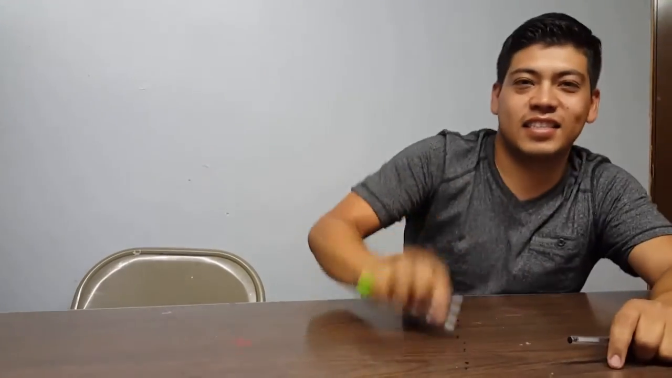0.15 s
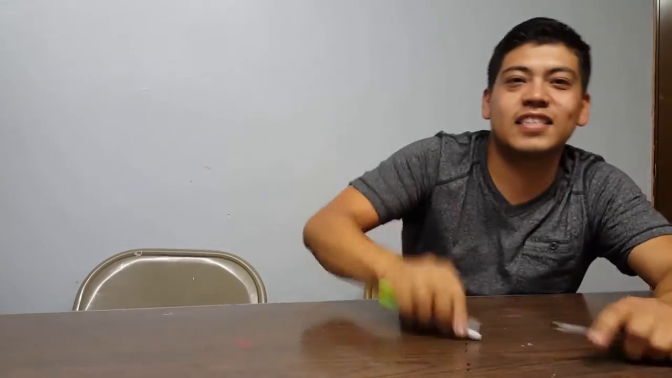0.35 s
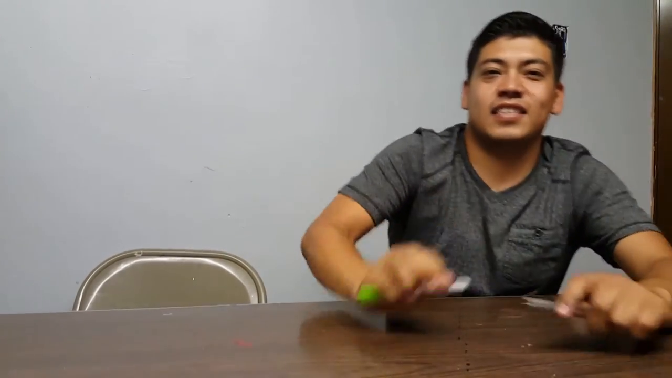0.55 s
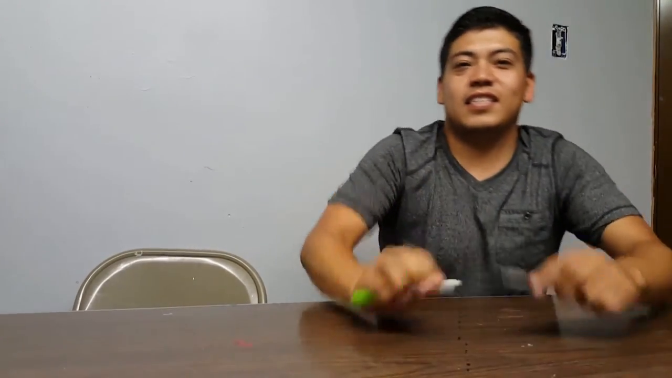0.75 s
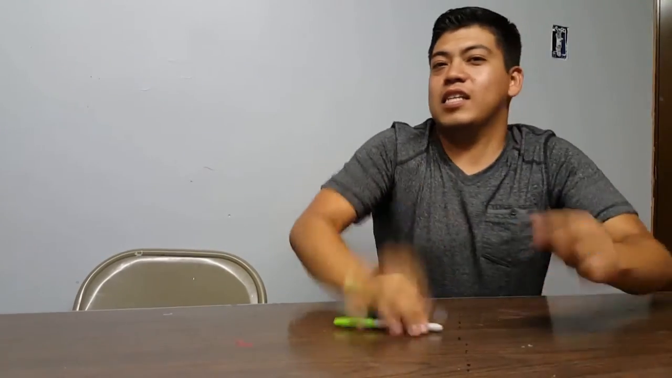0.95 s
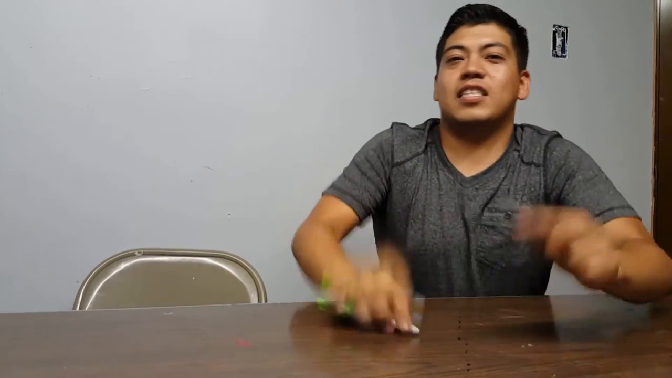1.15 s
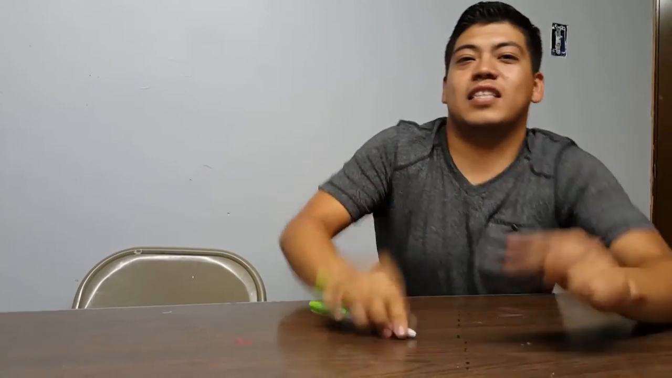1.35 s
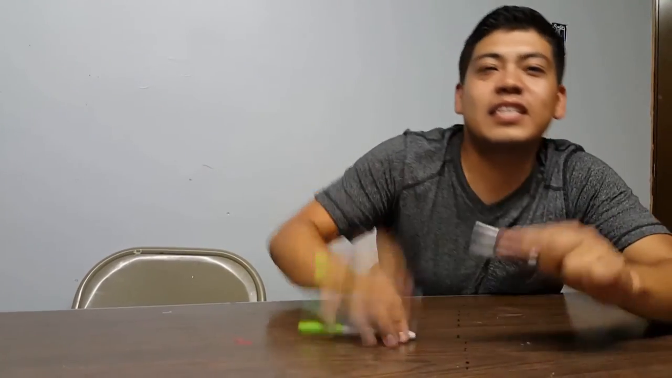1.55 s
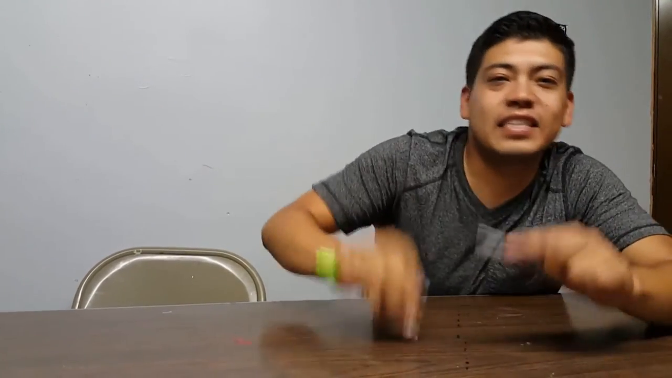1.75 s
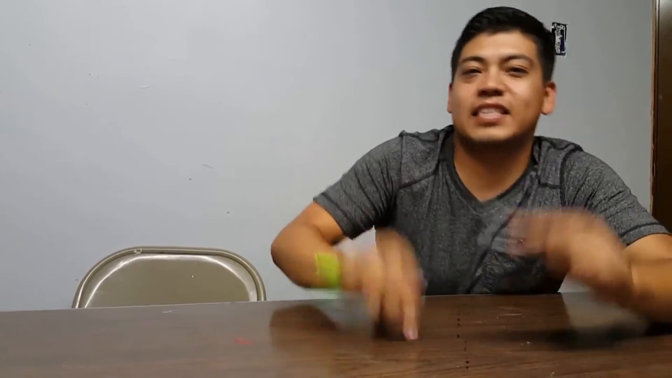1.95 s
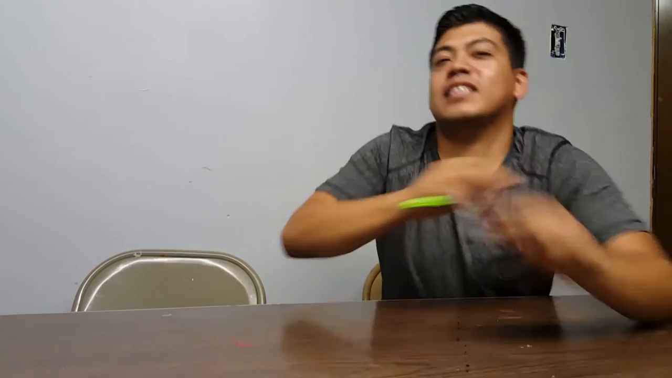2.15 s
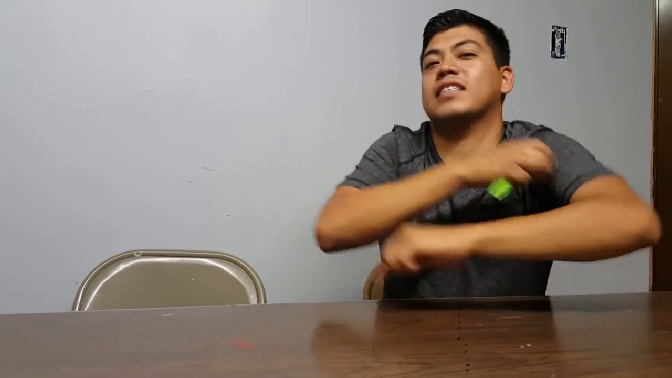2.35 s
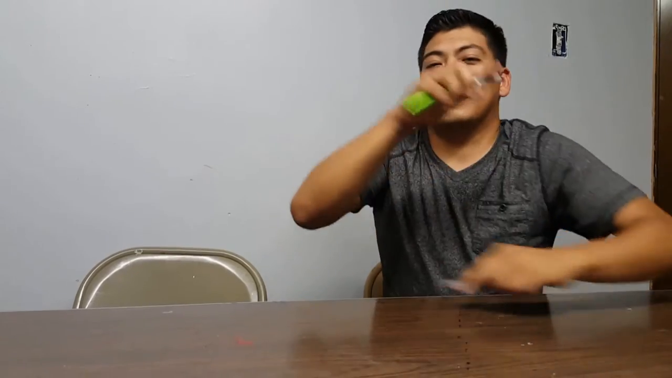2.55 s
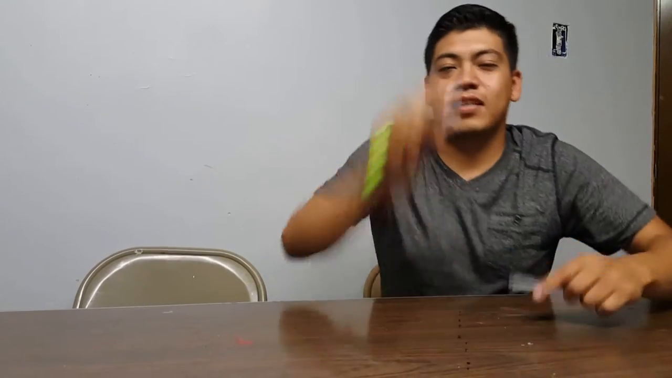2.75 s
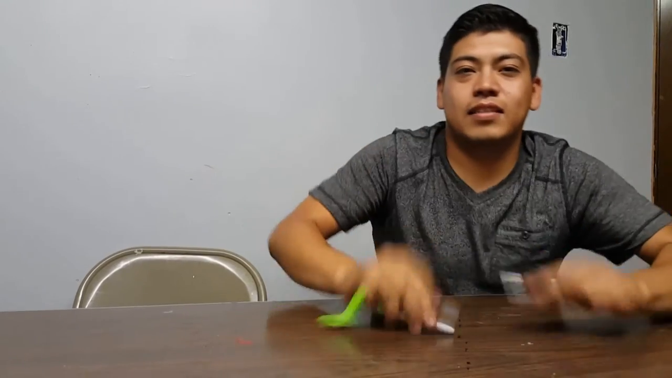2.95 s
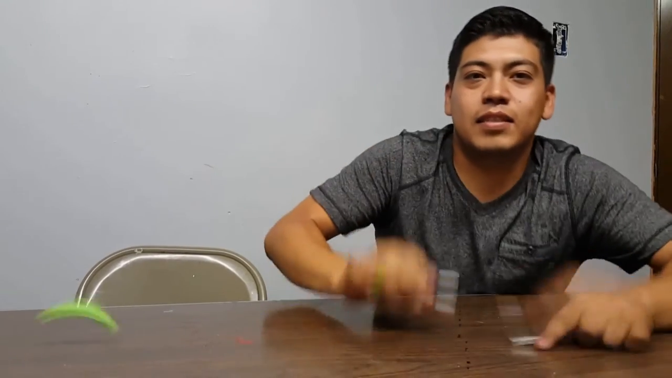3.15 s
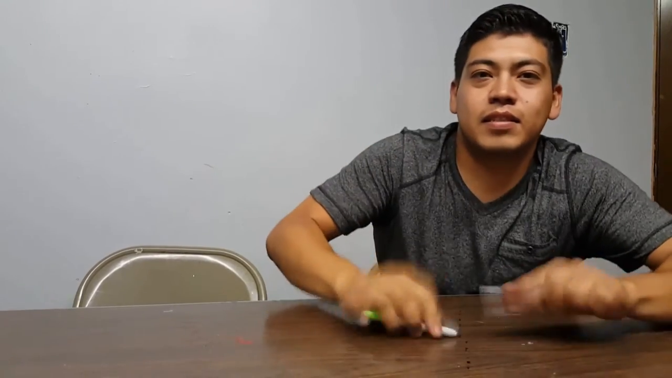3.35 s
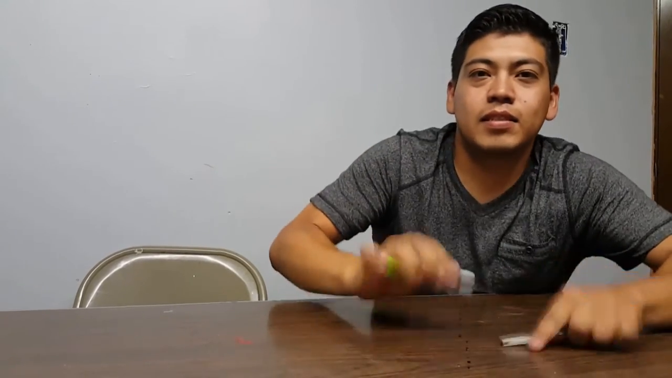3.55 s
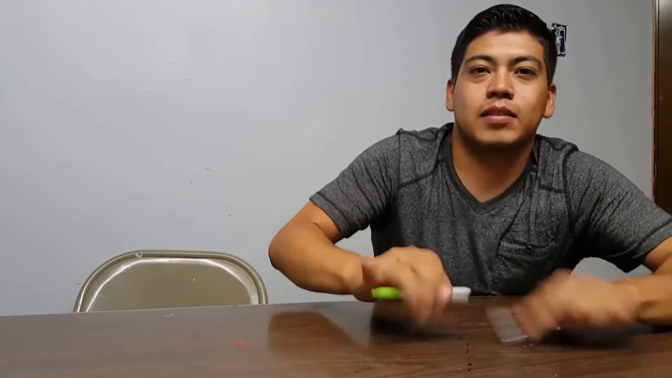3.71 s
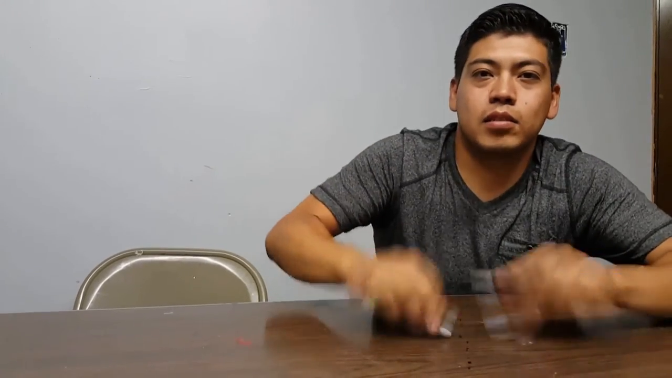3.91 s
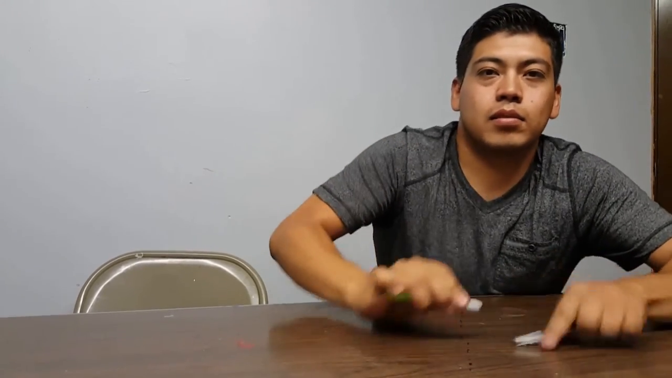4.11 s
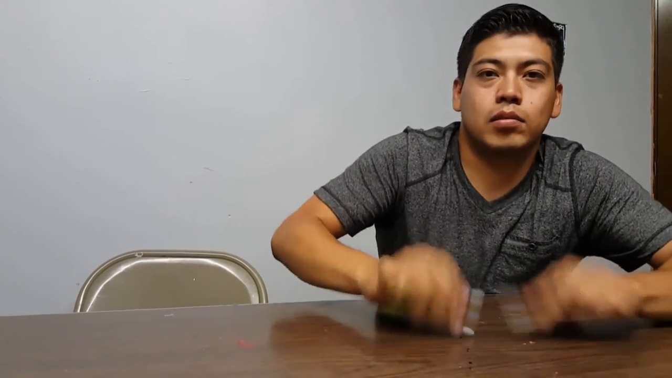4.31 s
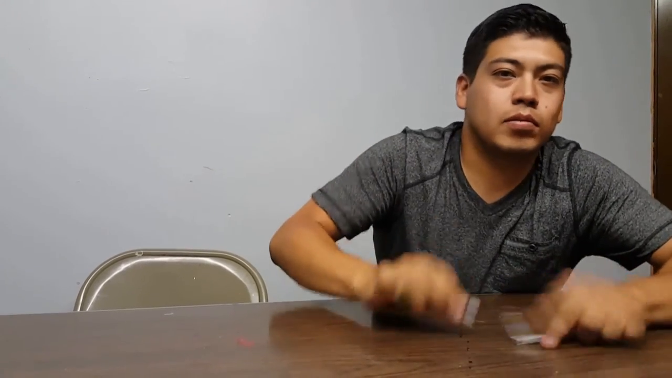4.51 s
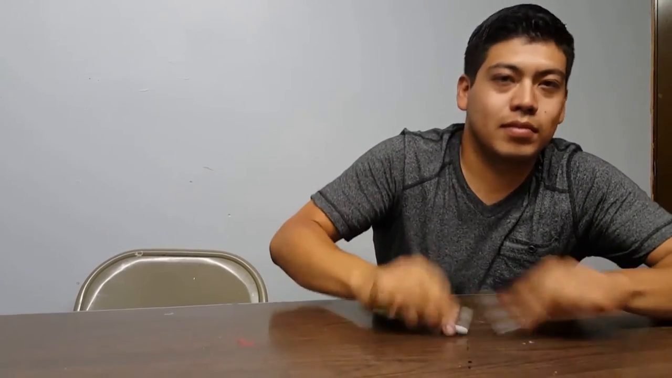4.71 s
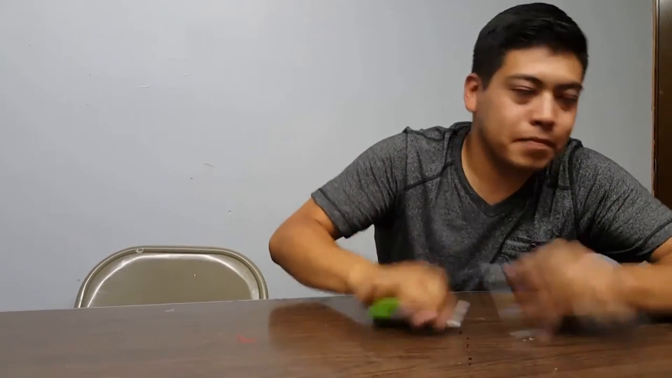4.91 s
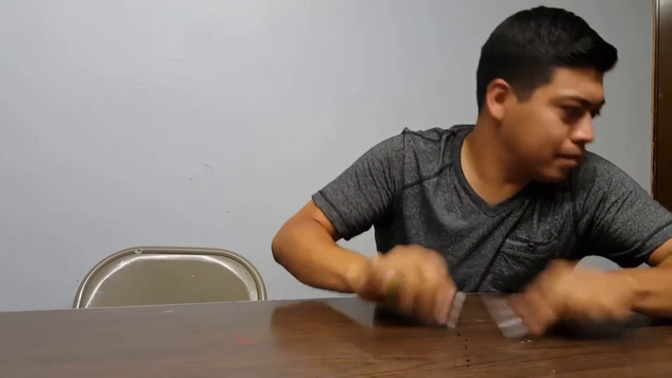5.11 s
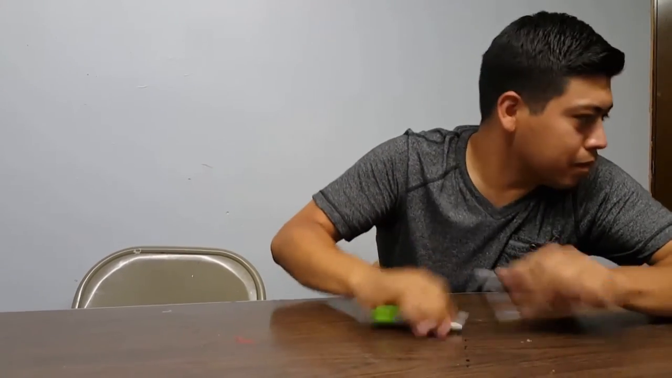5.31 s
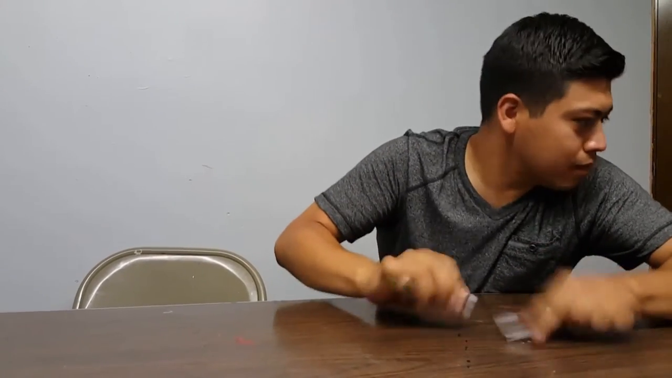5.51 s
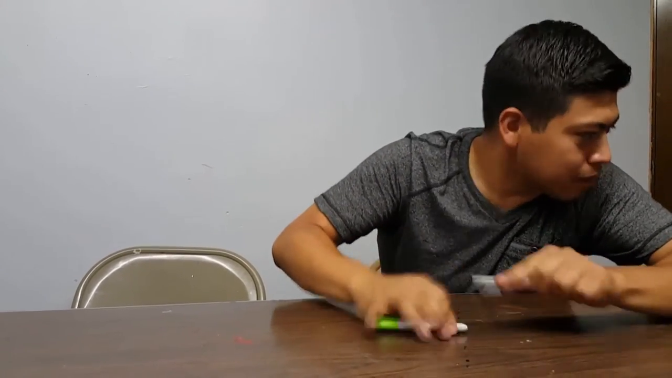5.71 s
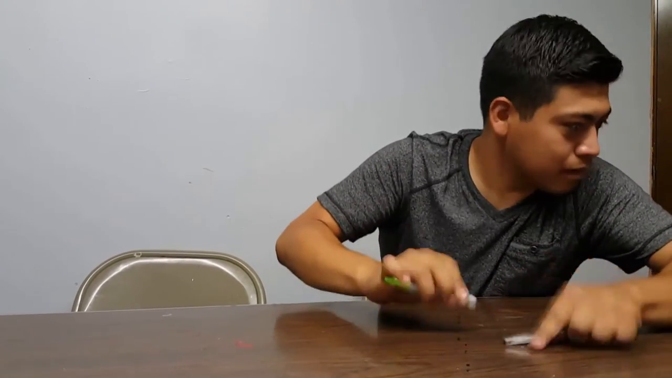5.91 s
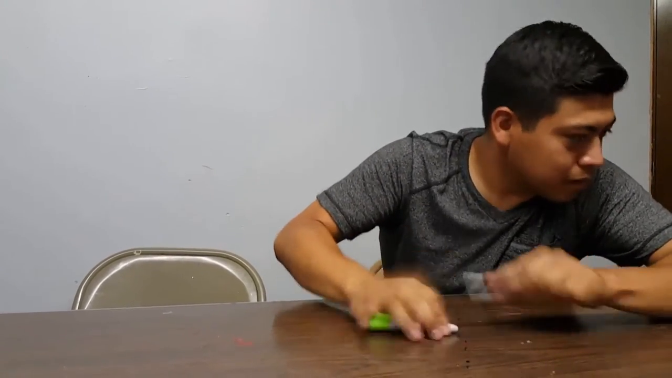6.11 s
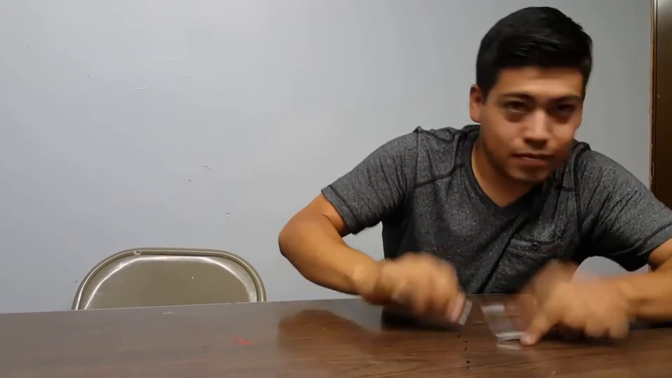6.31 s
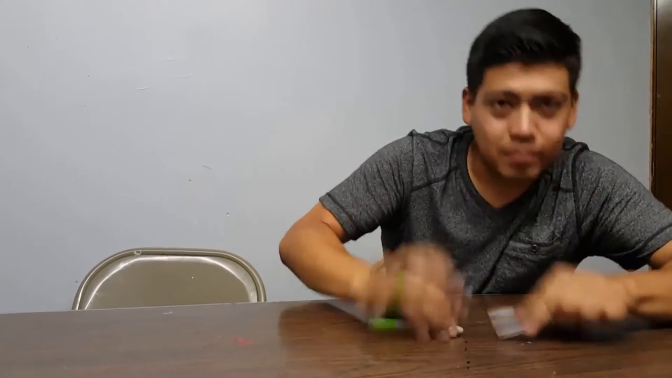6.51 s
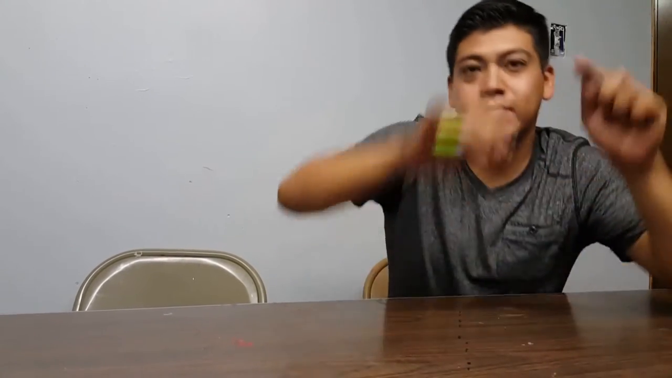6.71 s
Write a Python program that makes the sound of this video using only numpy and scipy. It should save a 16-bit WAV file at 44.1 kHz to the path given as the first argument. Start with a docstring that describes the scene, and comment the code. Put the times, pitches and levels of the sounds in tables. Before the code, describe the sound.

In a small, hard-walled room, pens and hands drum on a wooden table close to a small recorder. A tip and flat slap land at 0.1 s, soft wrist touches at 0.3, a tap at 0.5, then deep thumps at 0.7 and 0.9. A bright slap cracks at 1.15, followed by lighter quick taps, a slap at 1.75 and firmer taps until 2.25. A break leaves only room tail and faint hiss with hum. At 3.0 a heavy thump starts a dense, loud run of ticks and woody knocks, with slaps at 3.15, 3.4 and 3.8. It softens around 4.0, a dull wrist thump falls at 4.2, and strong taps return from 4.5. The sharpest slap hits at 5.07. Lighter rapid taps continue, punctuated by rattling slaps at 5.5, 5.9, 6.3 and 6.74, where it ends.

```python
"""A small bare room with a wooden table: two pens and the hands that hold them drum on it fast, close by.
Each blow rings banks of decaying modes: a plastic tick, a knock of pen on board, a thump of the table top.
Flat slaps add a crack, a push of air and a rattling refill; a few light taps ring briefly near 2 kHz.
Echoes and shaped noise are the room. Faint hum and hiss swell and dip behind; the gain control of the small
recorder sinks after sharp blows."""
import sys
import numpy as np
from scipy import signal
from scipy.fft import rfft, irfft, next_fast_len
from scipy.io import wavfile
from scipy.ndimage import uniform_filter1d

SR = 44100
rng = np.random.default_rng(int(sys.argv[2]) if len(sys.argv) > 2 else 0)


def level_to_linear(level):
    """Convert decibel levels to linear amplitude factors, elementwise."""
    exponent = np.asarray(level, float) / 20
    return 10 ** exponent


def generate_wav(sig):
    """Save sig (samples, or channels by samples) to the path in sys.argv[1] as 16-bit PCM at SR."""
    pcm = np.round(np.clip(np.atleast_2d(sig).T, -1, 1) * 32767).astype(np.int16)
    wavfile.write(sys.argv[1], SR, pcm)


N = 298116
TOP_HZ = 16500  # upper edge of all noise and of the microphone signal

# Blow levels are relative: each source trims them.
# taps of a pen tip or knuckle: t/s, tick level/dB, thump level/dB, knock level/dB, f/Hz the knock leans to
TAPS = [(0.4964, -26.5, -27.5, -47.5, 1440), (0.9519, -27.5, -27, -42.5, 720),
        (1.0505, -31, -45, -43.5, 750), (1.2161, -33.5, -31.5, -46, 1080), (1.3448, -39.5, -38, -57, 610),
        (1.4376, -38, -45.5, -50.5, 1120), (1.5381, -42.5, -40, -57.5, 524),
        (1.6214, -38.5, -39.5, -50, 1220), (1.8253, -33, -33.5, -49.5, 1330), (1.9625, -40, -39, -53, 1280),
        (2.0383, -27.5, -27.5, -38, 910), (2.1554, -29.5, -30.5, -51, 805),
        (2.2518, -26, -22.5, -33.5, 1290), (3.083, -25, -23, -34, 850), (3.215, -25, -29, -36.5, 1093),
        (3.2869, -29.5, -25, -39, 537), (3.3486, -25, -23, -32.5, 1160), (3.4733, -24.5, -26, -38, 1200),
        (3.5414, -29, -31.5, -52, 600), (3.601, -28.5, -33, -40, 1300), (3.6658, -30.5, -30.5, -45, 527),
        (3.7264, -25.5, -28, -34.5, 1080), (3.8613, -31.5, -31.5, -44, 1190), (3.9601, -39, -46, -63, 1020),
        (4.0153, -41, -64, -60.5, 2630), (4.0772, -40.5, -44, -63, 640), (4.1353, -34, -35.5, -43, 1080),
        (4.4576, -33.5, -43, -46, 800), (4.5317, -33, -33, -57, 680), (4.5915, -25.5, -32, -34, 843),
        (4.6658, -27.5, -20.5, -36, 550), (4.7199, -31.5, -52, -40.5, 720),
        (4.8006, -37.5, -34, -50.5, 617), (4.86, -32.5, -36, -44.5, 716), (4.9268, -30.5, -28, -52, 610),
        (4.9941, -23, -27, -33.5, 830), (5.1388, -27.5, -36, -38, 1150), (5.2186, -37.5, -74, -62, 760),
        (5.2698, -36.5, -66, -52, 616), (5.3403, -42, -36.5, -54.5, 565), (5.3976, -33, -35, -43.5, 977),
        (5.5477, -31.5, -36, -43.5, 1040), (5.6232, -37.5, -39, -58, 1000), (5.6843, -34.5, -41, -45, 740),
        (5.7509, -38, -34, -54, 557), (5.8212, -32.5, -38, -42.5, 1330), (5.9629, -34, -41, -51, 880),
        (6.0433, -42.5, -63, -60.5, 674), (6.1018, -35.5, -46.5, -54, 705), (6.1707, -42, -38, -56.5, 684),
        (6.235, -32.5, -37, -42.5, 880), (6.3846, -32, -35.5, -47, 970), (6.4664, -37, -44.5, -65, 960),
        (6.5271, -33.5, -46, -47.5, 720), (6.5964, -37, -35.5, -54, 820), (6.661, -30.5, -35.5, -41, 1050)]
# a tip touching down just ahead of a slap, or skipping after a thump: t/s, tick level/dB
TIPS = [(0.0751, -22), (1.135, -22.5), (1.742, -33), (3.004, -29.5), (3.1488, -34), (3.165, -53),
        (3.411, -25), (3.8019, -28.5), (4.2154, -46), (5.0647, -28.5), (5.4764, -32.5), (5.8894, -36.5),
        (6.3097, -31), (6.7292, -39)]
# heel of the hand or wrist, deep and dull: t/s, tick level/dB, thump level/dB, knock level/dB
WRISTS = [(0.2886, -39.5, -43, -65), (0.3054, -41.5, -38, -56.5), (0.6944, -29.5, -14.5, -41.5),
          (0.7597, -48, -27.5, -44), (0.8423, -44, -56, -59), (0.897, -33, -14.5, -40),
          (2.9982, -30.5, -14.5, -34), (4.2068, -30, -23.5, -44.5), (4.285, -40, -65, -52),
          (4.3776, -44.5, -71, -63)]
# pen and hand laid flat: t/s, tick level/dB, thump level/dB, knock level/dB, level/dB of squeezed-out air
SLAPS = [(0.0824, -32.5, -26.5, -25.5, -43), (1.1419, -23.5, -45, -28.5, -31.5),
         (1.7507, -31, -35, -56, -69), (3.1548, -28, -33, -49, -62), (3.416, -25, -22, -46, -69),
         (3.8059, -29, -27.5, -29.5, -33.5), (5.0716, -17.5, -18.5, -30.5, -51),
         (5.4826, -24, -31.5, -35, -67), (5.8959, -25.5, -28, -33, -69), (6.3164, -24.5, -30, -40, -78),
         (6.736, -25.5, -24, -49, -54)]
# pen barrel against the board: f/Hz, level/dB, t60/s of one pole before extra damping
KNOCK = [(572, 10.5, 0.046), (720, -5, 0.069), (1023, -10, 0.042), (1080, 4, 0.012), (1330, 13.5, 0.0039),
         (1600, 4.5, 0.017), (1650, 14, 0.0016), (2640, 10, 0.013), (2960, 8.5, 0.014)]
# loose refill in the barrel: f/Hz, level/dB, t60/s before extra damping
RATTLE = [(1000, -17, .04), (1544, 10.5, .03), (2350, 4, .02), (2820, -0.5, 0.045), (4620, -6, 0.064),
          (5400, -6, 0.027)]


def palm_hz(push_db):
    """The more palm (push of air) in a slap, the lower its knock: an octave for 48 dB."""
    return 1150 * 2 ** ((-27 - push_db) / 48)


# all blows, with the columns of the taps
BLOWS = (TAPS
         + [(s, db, db - 4.5, db - 12.5, 1514) for s, db in TIPS]
         + [row + (720,) for row in WRISTS]
         + [row[:-1] + (palm_hz(row[-1]),) for row in SLAPS])
BLOW_S, TICK_DB, THUMP_DB, KNOCK_DB, KNOCK_HZ = np.transpose(BLOWS)
INDEX = np.arange(len(BLOWS))
FLAT = INDEX >= len(BLOWS) - len(SLAPS)
WRIST = ~FLAT & (INDEX >= len(TAPS) + len(TIPS))
TIP = ~FLAT & ~WRIST & (INDEX >= len(TAPS))
EDGE_THUMP_HZ = 231 * (KNOCK_HZ / 814) ** -0.23  # duller knocks go with higher thumps
THUMP_HZ = np.where(FLAT, 235, np.where(WRIST, 135.5, EDGE_THUMP_HZ))


def evened(x):
    """Scales to unit rms."""
    return x / np.sqrt(np.mean(x ** 2) + 1e-20)


def strikes(size, lag_s=0):
    """One impulse of the given size at each blow, in each channel."""
    at = np.minimum(np.round((BLOW_S + lag_s) * SR).astype(int), N - 1)
    train = np.zeros((N,) + size.shape[1:], size.dtype)
    np.add.at(train, at, size)
    return train.T


def lean(modes, hz, db_per_octave):
    """Modes far from the pitch that a blow favours speak less."""
    octaves = np.log2(np.outer(1 / hz, np.transpose(modes)[0]))
    return -db_per_octave * abs(octaves)


def ring(modes, level_db, spread_db, turn, apart, lean_db=0, lag_s=0, damp=1, order=1, sweep=0):
    """Each blow shares its force among the modes anew; a mode driven twice over swells before it dies."""
    hz, db, t60 = np.transpose(modes)
    place = rng.standard_normal((len(BLOWS), len(modes), 3))
    share = level_to_linear(db + lean_db + spread_db * place[..., 0])
    share = share / np.linalg.norm(share, axis=1, keepdims=True) * level_to_linear(level_db)[:, None]
    # the two microphone ports hear each mode a little apart (radians)
    phase = turn * place[..., 1:2] + apart * place[..., 2:] * [1, -1]
    # upper modes come into step later: the pitch seems to rise
    phase -= sweep * np.arange(len(modes))[:, None] ** 2
    poles = np.exp((2j * np.pi * hz - damp * np.log(1000) / t60) / SR)
    out = np.zeros((2, N))
    for k, pole in enumerate(poles):
        peak = (np.e * (1 - abs(pole))) ** (order - 1)
        force = strikes(share[:, [k]] * np.exp(1j * phase[:, k]), lag_s)
        out += signal.lfilter([peak], np.poly([pole] * order), force).imag
    return out


def tick():
    """The plastic tip rings for an instant; the more knock under a tick, the higher the tick."""
    # tip of the pen: f/Hz, level/dB, t60/s of one pole
    tip_modes = [(3000, 3.5, 0.0026), (3600, 1.5, 0.0046), (4500, 1, 0.0024), (6670, 4.5, 0.002),
                 (8240, 13, 0.00072), (10700, 11.5, 0.00049), (14050, 8, 0.001), (14900, 4, 0.00093)]
    hz = np.clip(5560 * 2 ** ((KNOCK_DB - TICK_DB + 13.5) / 4), 3300, 9000)
    slope = np.where(FLAT | TIP, 0, 3.5)[:, None]
    return ring(tip_modes, TICK_DB + 0.5, 3, 2.41, 1.0, lean(tip_modes, hz, slope), order=2)


def tok(level_db, hz, lag_s):
    """The length of barrel that strikes rings briefly on its own note."""
    out, t = np.zeros((2, N + 4000)), np.arange(4000) / SR
    phase = rng.standard_normal((len(BLOWS), 2))
    for s, db, f, (turn, apart) in zip(BLOW_S + lag_s, level_db, hz, phase):
        wave = np.sin(2 * np.pi * f * t + turn + 0.52 * apart * np.array([[1], [-1]]))
        fade = level_to_linear(db - 60 * t * f / 26)  # 26 cycles to die by 60 dB
        out[:, round(s * SR):][:, :len(t)] += fade * np.minimum(t * f, 1) * wave
    return out[:, :N]


def knock():
    """The barrel knocks on the board through its modes, and except in slaps on its own note."""
    late_s = np.where(FLAT, 0, .006)  # after a tip lands, the barrel follows
    slope = np.where(FLAT, 5, 14)[:, None]
    modes = ring(KNOCK, KNOCK_DB + 3, 3, 1.2, .35, lean(KNOCK, KNOCK_HZ, slope), lag_s=late_s, damp=2, order=2)
    return modes + tok(np.where(FLAT, -200, KNOCK_DB + 6), KNOCK_HZ, late_s)


def crack():
    """A flat slap drives barrel and refill at once, heavily damped."""
    barrel = ring(KNOCK, np.where(FLAT, TICK_DB + 7, -200), 2, 1.0, .4, lean(KNOCK, KNOCK_HZ, 5), damp=4)
    refill = ring(RATTLE, np.where(FLAT, TICK_DB - 1.5, -200), 2.5, 1.0, .4, damp=3.65)
    return barrel + refill


def thump():
    """The table top rings in its low modes, kept between 70 and 700 Hz by soft flesh and a small table."""
    # table top: f/Hz, level/dB, t60/s
    table_modes = [(83.5, -7, 0.25), (123.8, -8.5, 0.17), (150.6, 1, 0.19), (192.8, -5, 0.5),
                   (213.4, -0.5, 0.046), (254.6, -13, 0.22), (290.2, -3, 0.14), (329.3, -8.5, 0.59),
                   (459, -6.5, 0.17), (481.4, -2.5, 0.098)]
    leaning = lean(table_modes, THUMP_HZ, 18.0)
    out = ring(table_modes, THUMP_DB - 3.5, 3.16, 0.5, 0.11, leaning, lag_s=0.00099, sweep=0.2036)
    return signal.lfilter(*signal.butter(2, [70 / (SR / 2), 700 / (SR / 2)], "band"), out)


def push():
    """One swing of pressure, out and back, as each flat slap squeezes out air."""
    push_db = np.full(len(BLOWS), -200.)
    push_db[FLAT] = np.transpose(SLAPS)[-1]
    u = np.arange(SR // 20) / (0.00093 * SR)
    return np.convolve(strikes(level_to_linear(push_db + 24.5)), u * (2 - u) * np.exp(-u))[:N]


def rattle(count=24):
    """After a slap the refill chatters in the barrel: small uneven knocks, each on one of its modes."""
    s, tick_db, _, knock_db, _ = np.transpose(SLAPS)
    when, which, size, side = rng.random((len(SLAPS), count, 4)).transpose(2, 0, 1)
    late = 0.0027 + .07 * when  # s after the slap
    slap_db = 10 * np.log10(level_to_linear(tick_db) ** 2 + level_to_linear(knock_db + 4) ** 2)
    force = level_to_linear(slap_db[:, None] - 5 - 60 * late / .12 - 10 * size)  # weaker by 60 dB in 0.12 s
    at = np.minimum(((s[:, None] + late) * SR).astype(int), N - 1)
    pan = np.stack([np.cos(np.pi * side), np.sin(np.pi * side)], axis=-1)
    out = np.zeros((2, N))
    for k, (hz, db, t60) in enumerate(RATTLE):
        pick = (which * len(RATTLE)).astype(int) == k
        train = np.zeros((N, 2))
        np.add.at(train, at[pick], force[pick, None] * pan[pick])
        pole = np.exp((2j * np.pi * hz - np.log(1000) / t60) / SR)
        out += level_to_linear(db) * signal.lfilter([1], [1, -pole], train.T + 0j).imag
    return out


def small_taps():
    """Small light taps with a short dull note near 2 kHz, its pitch uneven by 4 %."""
    # 2 kHz taps: t/s, length/s, level/dB, f/Hz
    light_taps = [(3.150, .014, -38, 1950), (3.327, .014, -42, 2000), (3.5725, .012, -45, 2080)]
    out = np.zeros(N)
    for s, length, db, hz in light_taps:
        u = np.arange(0, length, 1 / SR) / length
        wobble = evened(uniform_filter1d(rng.standard_normal(2000), 150))[:len(u)]
        turns = np.cumsum(hz * (1 + .04 * wobble)) / SR
        envelope = np.minimum(u / 0.037, 1) * (1 - u)
        out[round(s * SR):][:len(u)] += level_to_linear(db) * envelope * np.sin(2 * np.pi * turns)
    return out


def delayed(x, seconds):
    """The same sound later, cut to length."""
    return np.pad(x, ((0, 0), (round(seconds * SR), 0)))[:, :N]


def wall_echo(sheen, body):
    """One wall answers after 17 ms with the sides swapped."""
    # answer to the ticks, left and right: level/dB
    echo_db = (-8.5, -8)
    return delayed(level_to_linear(echo_db)[:, None] * sheen[::-1] + level_to_linear(-12.5) * body[::-1], .017)


def walls(x, t60, first_s, per_s):
    """Sparse reflections of random sign, other ones at each port, carry the colour of each blow."""
    t = np.arange(SR // 3) / SR
    sign = rng.choice([-1., 1.], (2, len(t)))
    present = rng.random((2, len(t))) < per_s / SR
    taps = sign * present * (t > first_s) * level_to_linear(-60 * t / t60)
    taps = taps / np.linalg.norm(taps, axis=1, keepdims=True)
    return signal.oaconvolve(x, taps, axes=1)[:, :N]


def noise(points, same, low_hz=0, high_hz=TOP_HZ):
    """Two channels of noise, partly alike, with a given spectrum inside a soft-edged band."""
    size = next_fast_len(N)
    hz = np.fft.rfftfreq(size, 1 / SR) + 1
    f, db = np.transpose(points)
    shape = level_to_linear(np.interp(np.log(hz), np.log(f), db))
    shape = shape / np.sqrt((1 + (low_hz / hz) ** 8) * (1 + (hz / high_hz) ** 8))
    both, side = rng.standard_normal((2, size))
    same = np.clip(same, 0, 1)
    pair = np.sqrt(1 + same) * both + np.sqrt(1 - same) * np.outer([1, -1], side)
    return evened(irfft(rfft(pair) * shape, size)[:, :N])


def patchy(x):
    """Reflections bunch up unevenly: patches of about 700 Hz by 12 ms stand out or sink by 3 dB rms."""
    z = signal.stft(x, nperseg=256, noverlap=192)[2]
    field = uniform_filter1d(rng.standard_normal(z.shape[:0:-1]), 8, 0)
    field = evened(uniform_filter1d(field, 4, 1)).T
    return signal.istft(z * level_to_linear(3 * field), nperseg=256, noverlap=192)[1][:, :N]


def room():
    """In each band the energy of a blow swells as reflections arrive, then dies away."""
    # bands: lower edge f/Hz, level/dB against the blow, t60/s, rise/s, left-right likeness
    bands = [(53.4, -14, 0.7, 0.0049, 1), (159.4, -9, 0.34, 0.015, 0.94), (430, -11.5, 0.35, 0.0045, 0.39),
             (960, -2.5, 0.16, 0.00033, 0.024), (1900, 0.5, 0.18, 0.00081, 0.023),
             (4560, 1, 0.26, 0.0016, 0.018), (9150, 6, 0.19, 0.0016, 0.023)]
    # colour of the ring at the microphone: f/Hz, relative level/dB per Hz
    ring_colour = [(24, -64), (40, -25.5), (231, -1.5), (363, -12), (2770, -31), (15300, -56), (16000, -62)]
    deep_db = THUMP_DB - 15 * np.log2(THUMP_HZ / 150)  # only the heavy, low blows stir the deepest bass
    # for its tick, a slap feeds the treble less and a skipping tip more
    fed_db = TICK_DB + np.where(FLAT, -15.5, 0) + np.where(TIP, 8.5, 0)
    bright_db = 10 * np.log10(level_to_linear(fed_db - 29) ** 2 + level_to_linear(KNOCK_DB - 32) ** 2)
    out, edges = np.zeros((2, N)), [row[0] for row in bands] + [TOP_HZ]
    for (low_hz, db, t60, rise, same), high_hz in zip(bands, edges[1:]):
        # the middle of the band decides which parts of a blow feed it
        place = np.interp(np.log(low_hz * high_hz) / 2, np.log([90, 300, 900, 6000]), range(4))
        shares = np.maximum(1 - abs(place - np.arange(4)), 0)
        source_db = shares @ [deep_db, THUMP_DB, KNOCK_DB, bright_db]
        fall, swell = np.exp(-2 * np.log(1000) / t60 / SR), np.exp(-1 / (rise * SR))
        gap_s = .007 * (shares[-1] > 0)  # the treble starts after a short hush
        power = signal.lfilter([1], [1, -fall], strikes(level_to_linear(source_db + db) ** 2, gap_s))
        power = signal.lfilter([1 - swell], [1, -swell], power)
        out += np.sqrt(power) * noise(ring_colour, same, low_hz, high_hz)
    return patchy(out)


def background():
    """Shaped-noise hiss and two faint wavering sines of hum swell and dip together."""
    # hum: f/Hz, middle level/dB against the hiss
    hum_tones = [(123.8, -5.5), (247.6, -5.5)]
    # swells and dips: t/s, level/dB
    stir = [(0, -52.5), (.65, -54), (.8, -43.5), (1.12, -42), (1.3, -70), (2.3, -54), (2.5, -54.5),
            (2.95, -54.5), (3.1, -42.5), (3.8, -55.5), (4.05, -71), (4.35, -55), (5.3, -63), (6.76, -64)]
    # hiss: f/Hz, relative level/dB per Hz
    hiss_colour = [(18, -49), (30, -17), (124, -16.5), (174, -5), (252, -7), (280, -10.5), (437, -11),
                   (526, -14), (1500, -23), (2700, -27.5), (3600, -34.5), (15300, -49.5), (16000, -70)]
    t = np.arange(N) / SR
    waver = uniform_filter1d(rng.standard_normal((len(hum_tones), N)), 6000)
    hum = np.zeros(N)
    for (hz, db), w in zip(hum_tones, waver):
        hum += level_to_linear(db + 1.1 * evened(w)) * np.sin(2 * np.pi * hz * t)
    return level_to_linear(np.interp(t, *np.transpose(stir))) * (noise(hiss_colour, 0.16) + hum)


def scene():
    """Pens and table, the wall echoes, the room and the background."""
    ticks, thumps = tick(), thump()
    hard = knock() + crack()
    body = hard + small_taps()
    pens = (body + ticks) * level_to_linear([[.6], [-.6]])  # a little to the left
    out = thumps + push() + pens + rattle()
    out += level_to_linear(-1.5) * walls(hard, 0.26, .004, 1760)
    # hard walls return the top of a tick
    sheen = signal.lfilter(*signal.butter(2, 4500 / (SR / 2), "high"), ticks)
    out += level_to_linear(-10.5) * walls(sheen, 0.17, .009, 400)
    out += wall_echo(sheen, body)
    out += delayed(thumps, .023)  # the bass of a blow comes back from the far wall
    return out + room() + background()


def top_cut(x):
    """Nothing passes above the cut-off."""
    return signal.sosfilt(signal.butter(12, 16640, fs=SR, output="sos"), x)


def record(dry):
    """Gain control listens above the bass, sinks after sharp blows and creeps back."""
    heard = signal.lfilter(*signal.butter(2, 700 / (SR / 2), "high"), dry.mean(0))
    power_db = 10 * np.log10(abs(uniform_filter1d(heard ** 2, 900)) + 1e-12)
    fall = np.arange(N) * 36.0 / SR  # the held peak falls 36 dB a second
    over_db = np.maximum(np.maximum.accumulate(power_db + fall) - fall + 26.0, 0)  # above -26 dB
    lag = np.exp(-1 / (0.12 * SR))  # 0.12 s smoothing
    duck_db = 0.077 * signal.lfilter([1 - lag], [1, -lag], over_db)
    # the microphone port weakens one band
    mic = 0.62 * dry + 0.56 * signal.lfilter(*signal.iirnotch(10300, 7.5, SR), dry)
    mic = .4 * np.tanh(mic / .4)  # the input stage rounds off the hardest peaks
    mic = signal.oaconvolve(mic, signal.firwin(255, TOP_HZ, fs=SR)[None], "same")
    return top_cut(mic / level_to_linear(duck_db))


dry = scene()
out = record(dry)
generate_wav(out)
```